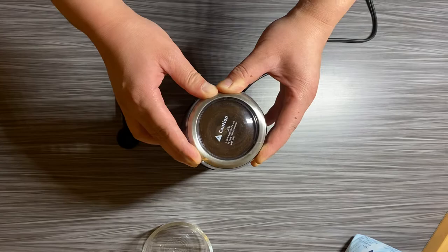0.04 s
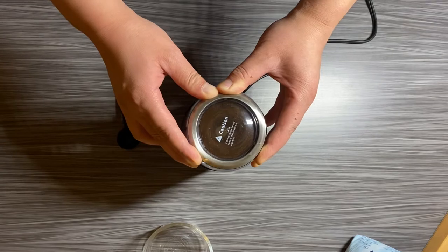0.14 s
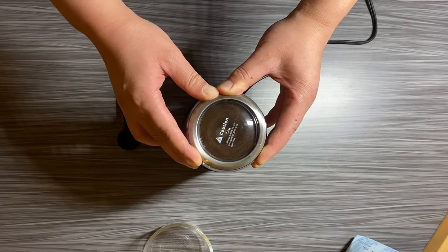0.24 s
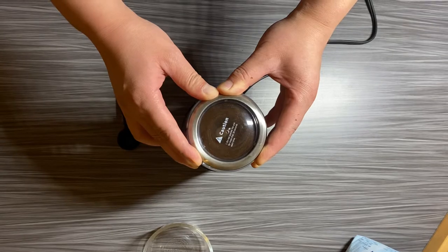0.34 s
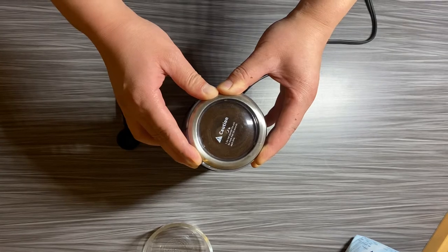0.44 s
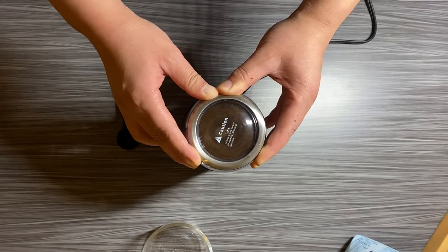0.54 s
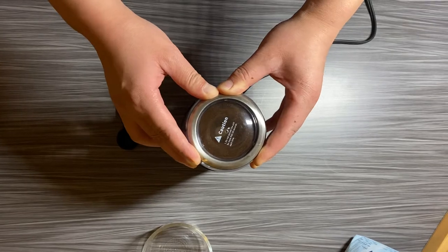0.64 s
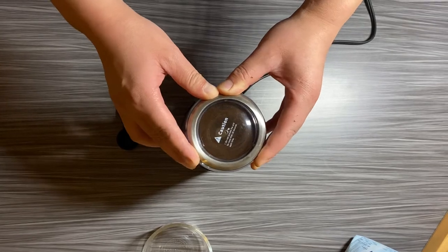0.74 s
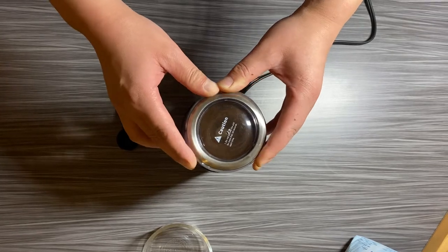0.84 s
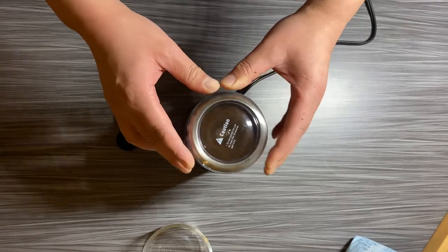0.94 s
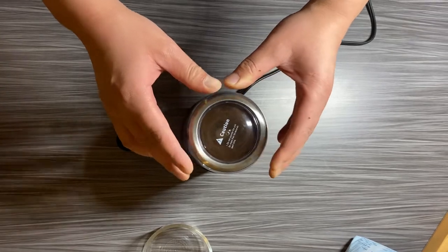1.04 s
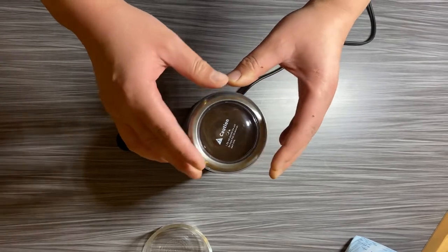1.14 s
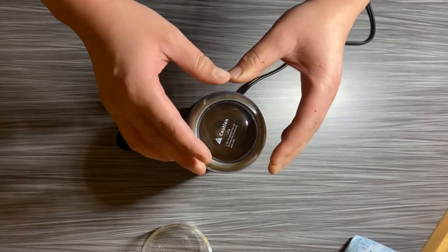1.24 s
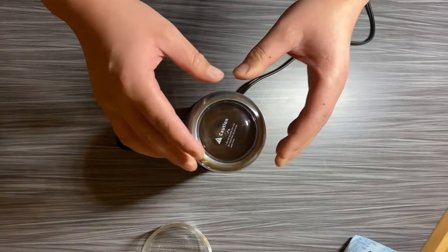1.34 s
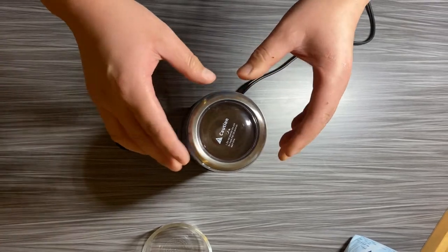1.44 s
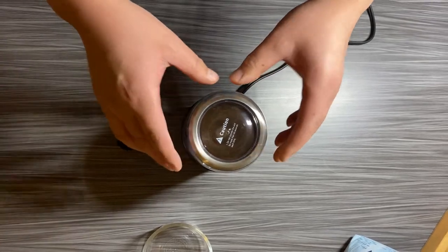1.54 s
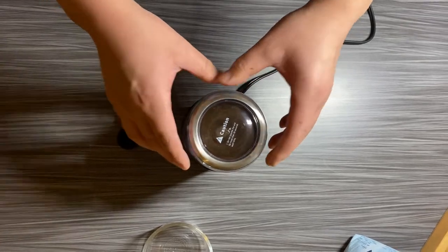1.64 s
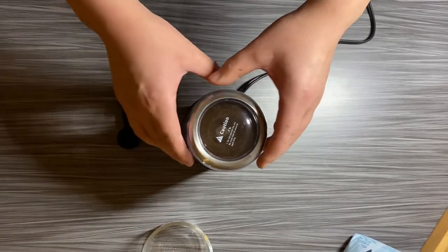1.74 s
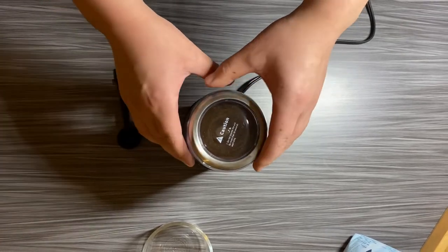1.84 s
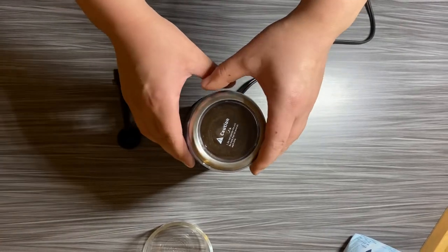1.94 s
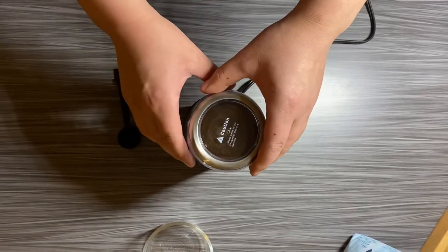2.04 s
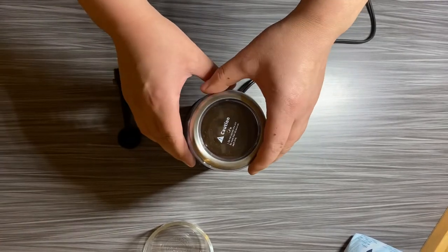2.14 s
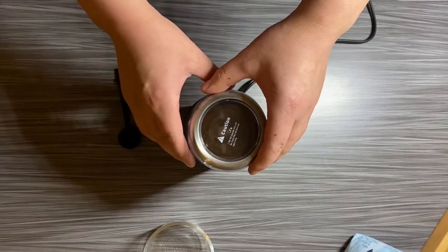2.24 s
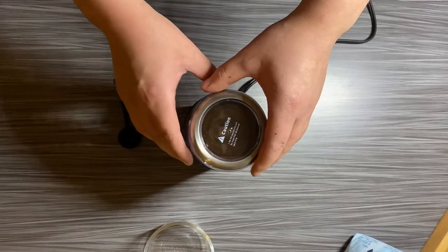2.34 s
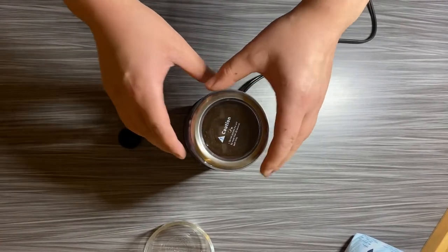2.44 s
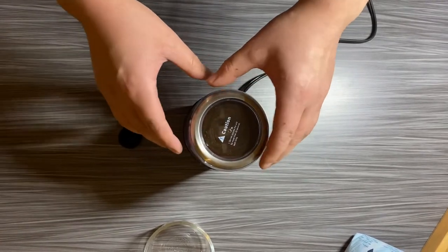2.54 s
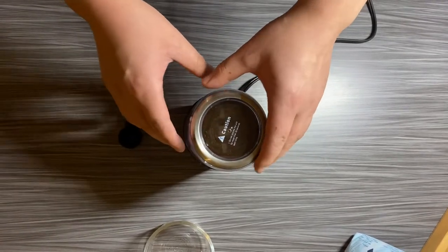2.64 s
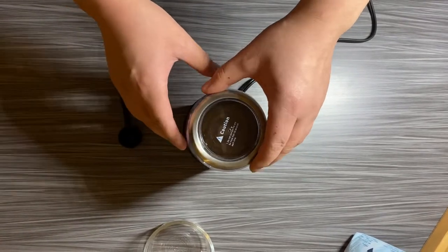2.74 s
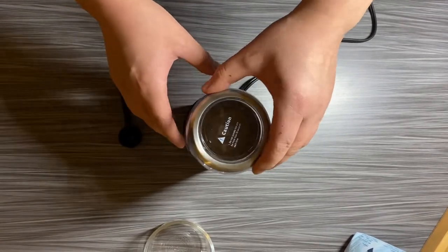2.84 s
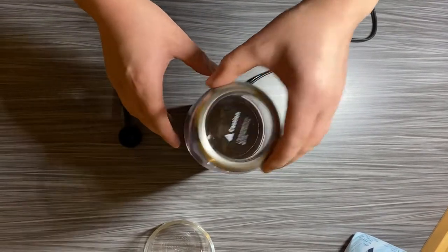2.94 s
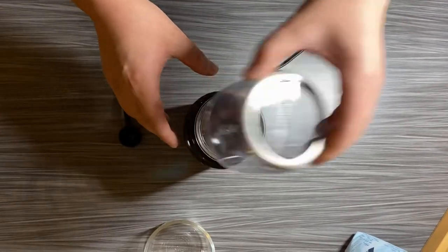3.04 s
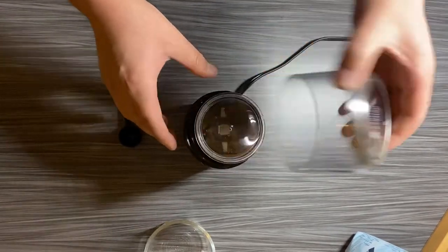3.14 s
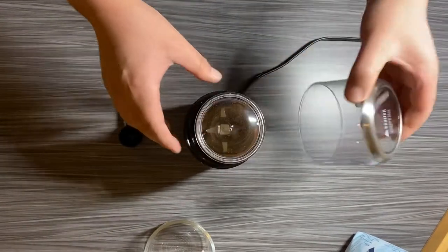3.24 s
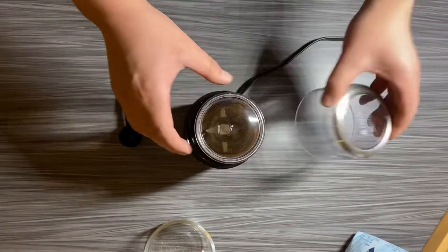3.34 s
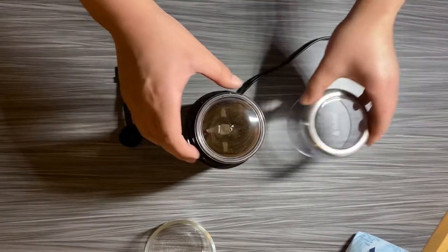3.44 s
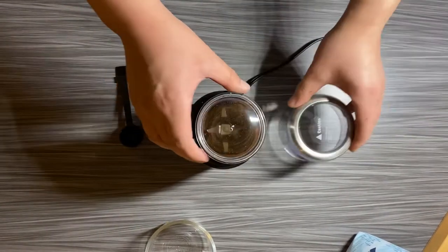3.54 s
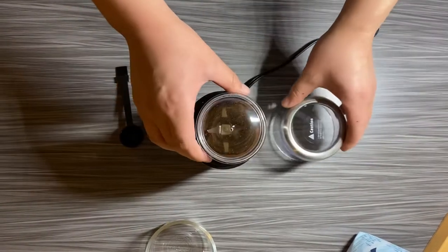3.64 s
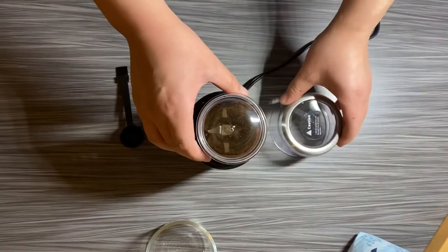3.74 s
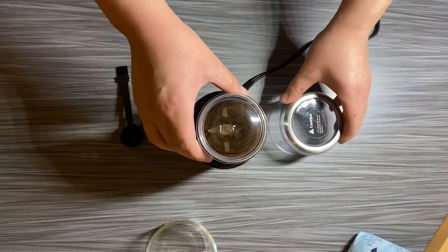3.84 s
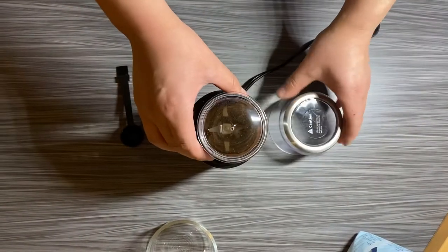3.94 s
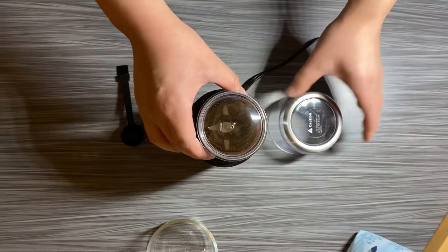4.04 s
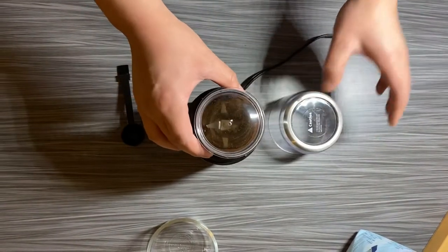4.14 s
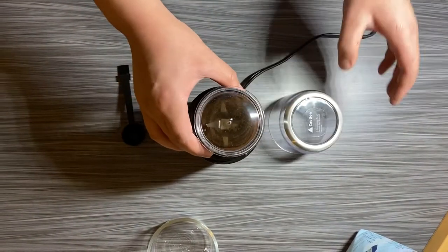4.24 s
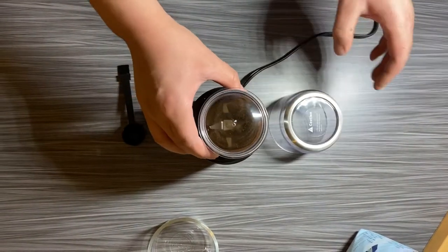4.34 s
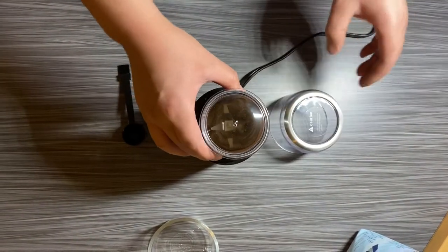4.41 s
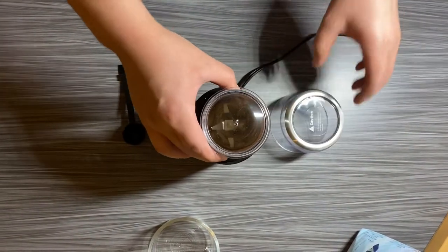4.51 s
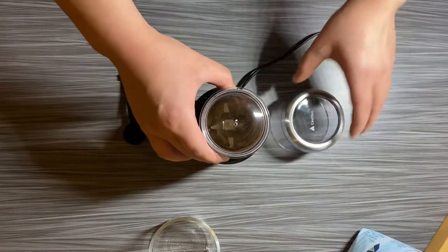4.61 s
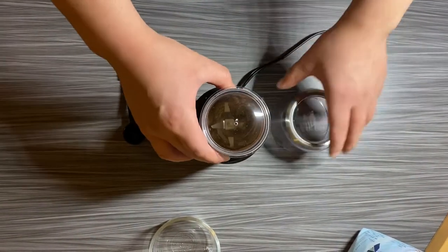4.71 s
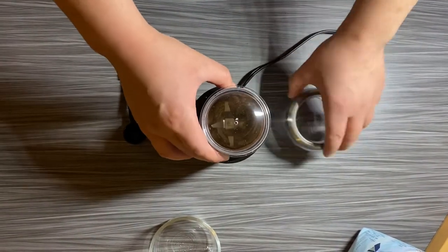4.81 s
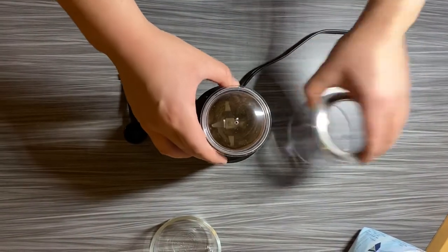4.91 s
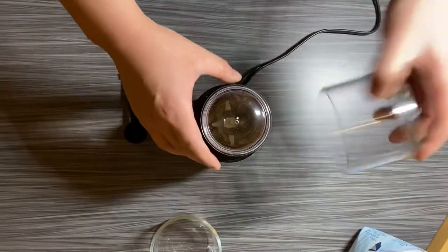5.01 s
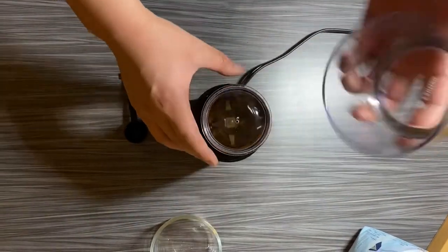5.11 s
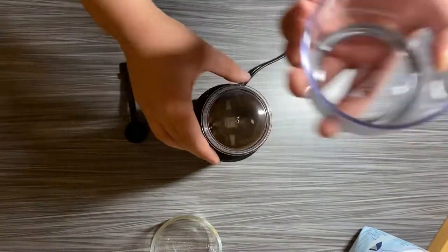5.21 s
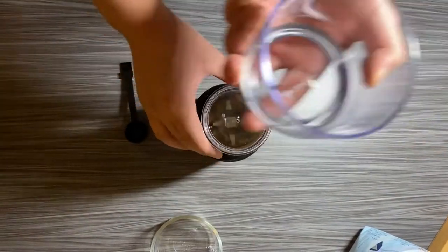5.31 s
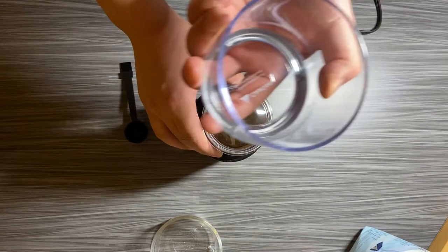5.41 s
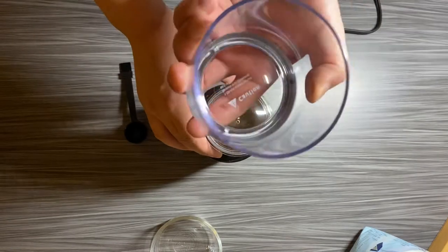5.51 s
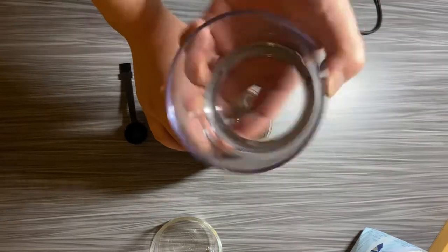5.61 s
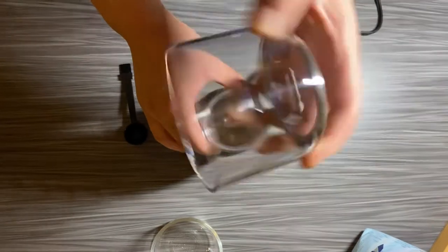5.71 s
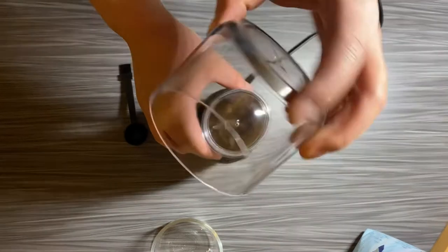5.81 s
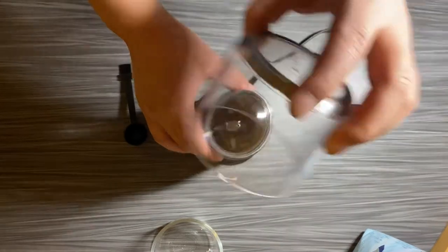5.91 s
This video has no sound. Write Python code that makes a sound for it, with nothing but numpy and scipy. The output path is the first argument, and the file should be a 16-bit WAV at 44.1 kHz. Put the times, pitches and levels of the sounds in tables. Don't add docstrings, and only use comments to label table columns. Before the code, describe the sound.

Handheld grinder buzzes at full speed, coasts down in a falling whine with rattling crumbs, then quiet lid clicks and one loud table knock.

```python
import sys
import numpy as np
from scipy import signal
from scipy.fft import rfft, irfft, next_fast_len
from scipy.io import wavfile

SR = 44100
rng = np.random.default_rng(int(sys.argv[2]) if len(sys.argv) > 2 else 0)


def voltage_ratio(decibels):
    exponent = np.asarray(decibels, float) / 20
    return 10 ** exponent


def transcribe(signal):
    frames = np.atleast_2d(signal).T
    limited = np.clip(frames, -1, 1)
    pcm = np.round(limited * 32767).astype(np.int16)
    wavfile.write(sys.argv[1], SR, pcm)


N = 263277
T = np.arange(N) / SR
FULL_HZ = 422
COAST_S = 0.695


def evened(x):
    return x / np.sqrt(np.mean(x ** 2) + 1e-20)


def peaked(x, db):
    return voltage_ratio(db) * x / abs(x).max()


def add(mix, s, sound):
    part = mix[round(s * SR):][:len(sound)]
    part += sound[:len(part)]


def bump(s, length):
    return np.exp(-.5 * ((T - s) / max(length, .005)) ** 2)


def step(s, rise):
    return .5 + .5 * np.tanh((T - s) / max(rise, .002))


def read(points, hz):
    f, value = np.transpose(points)
    return np.interp(np.log(hz + 1), np.log(f + 1), value)


def curve(rows, axis=1, fade=.03):
    rows = np.array(rows)
    outside = np.maximum(rows[0, 0] - T, 0) + np.maximum(T - rows[-1, 0], 0)
    return voltage_ratio(np.interp(T, rows[:, 0], rows[:, axis]) - 20 * outside / fade)


def colour(x, gain):
    size = next_fast_len(N)
    return irfft(rfft(x, size) * gain(np.fft.rfftfreq(size, 1 / SR)), size)[..., :N]


def above(x, order, hz):
    return signal.sosfilt(signal.butter(order, hz, "high", fs=SR, output="sos"), x)


def ringing(x, resonances):
    def response(f):
        total = 0
        for k, (hz, width, db) in enumerate(resonances):
            detuning = (f * f - hz * hz) / (np.maximum(f, 1) * width)
            total = total + (-1) ** k * voltage_ratio(db) / (1 + 1j * detuning)
        return total
    return colour(x, response)


def wander(hz):
    return evened(colour(rng.standard_normal(N), lambda f: np.exp(-(f / hz) ** 2)))


def speed():
    ease_s, sag_hz_per_s2 = 0.4, 80
    drag_s, friction_hz = 1.72, 300
    powered = FULL_HZ - sag_hz_per_s2 * (np.clip(T, ease_s, COAST_S) - ease_s) ** 2
    decay = np.exp(-np.maximum(T - COAST_S, 0) / drag_s)
    return np.maximum((powered + friction_hz) * decay - friction_hz, 1)


def turns():
    return np.cumsum(speed()) / SR


def order_db(order):
    # powered level in dB, coasting level at full speed in dB,
    # time in seconds when the drive leaves it.
    order_levels = [(-27, -44, .66), (-42, -50, .625), (-33, -54, .615), (-37, -54, .75), (-36.5, -54, .62)]
    # frequency in Hz, width in Hz, lift in dB.
    swept = [(295.4, 44, 17.5), (352, 22, 9.5), (520, 25, 16), (700, 28, 4.5), (1040, 51, 7),
             (1640, 60, 10)]
    # time in seconds, length in seconds, change in dB.
    grip = [
        (.56, .05, -2.5),
        (.585, .045, 18),
        (.51, .04, -11),
        (.705, .025, 8),
        (.57, .04, -3),
    ]
    powered_db, coast_db, off_s = order_levels[order - 1]
    s, length, change_db = grip[order - 1]
    shaft = speed()
    lift_db = sum(db / (1 + ((order * shaft - hz) / width) ** 2) for hz, width, db in swept)
    unbalance_db = 29.5 * np.log10(shaft / FULL_HZ)
    coasting = coast_db + lift_db + unbalance_db - 400 * np.maximum(T - 1.3, 0)
    off = step(off_s, .01)
    return (1 - off) * (powered_db + change_db * bump(s, length)) + off * coasting


def rotor():
    # order, level in dB.
    high_orders = [(7, -55), (9, -64.5), (10, -56.5), (11, -60.5)]
    angle = 2 * np.pi * turns()
    flutter_db = .4 + 4 * step(COAST_S, 0.017)
    low = 0
    for k in range(1, 6):
        level = voltage_ratio(order_db(k) + flutter_db * wander(15))
        low = low + level * np.sin(k * angle + 0.044 * wander(25))
    high = 0
    for k, db in high_orders:
        high = high + voltage_ratio(db + 0.72 * wander(20)) * np.sin(k * angle + 0.35 * wander(36))
    high_db, high_off_s, fall_db_per_s = 9.5, 0.5, 157
    high_gain = voltage_ratio(high_db - fall_db_per_s * np.maximum(T - high_off_s, 0))
    return np.sqrt(2) * (low + high * high_gain)


def motor():
    # frequency in Hz, width in Hz, level in dB.
    held = [(130, 16, -7.5), (250, 72, -18.5), (356, 32, 0.5), (570, 4, -7.5), (600, 13, -5),
            (1040, 80, -4.5), (1152, 17, -10.5), (1319, 90, -13), (1443, 29, 1.5), (1560, 74, -15),
            (1808, 630, -22.5), (2410, 250, -20.5), (2707, 44, -12), (3370, 17, -28.5)]
    mains_angle = 2 * np.pi * 120 * T
    pulse = 1 + 0.21 * np.cos(mains_angle)
    shake = evened(ringing(rng.standard_normal(N) * pulse * voltage_ratio(2.2 * wander(82)), held))
    hum = voltage_ratio(-16 + 3.0 * wander(8)) * np.sin(mains_angle)
    drive_db, off_s, fall_db_per_s = -24.5, .52, 295.5
    return voltage_ratio(drive_db - fall_db_per_s * np.maximum(T - off_s, 0)) * (shake + hum)


def grounds():
    # time in seconds, level in dB.
    grind = [(0, -38.5), (.55, -38.5), (.68, -38), (.8, -38.5), (.86, -37.5), (1.02, -40), (1.11, -45),
             (1.42, -46), (1.57, -50.5), (1.83, -59.5), (1.88, -67), (2.05, -77.5), (2.12, -102)]
    # frequency in Hz, width in Hz, level in dB.
    base_modes = [(124, 21, -19), (300, 74, 0.5), (367, 93, -2), (496, 140, -9), (674, 50, -4),
                  (708, 72, -7.5)]
    cup_modes = [(1010, 200, -15.5), (1375, 34, -1), (1689, 80, 4.5), (1733, 21, -8.5), (2010, 89, -4.5),
                 (2300, 900, -12), (2623, 38, -1.5)]
    lid_ring = [(3030, 110, 0), (3115, 90, 0)]
    # frequency in Hz, density in dB per Hz.
    swirl_spectrum = [(400, -17.5), (700, -7.5), (1400, -4.5), (2300, -5.5), (4000, -1.5), (6000, -2.5),
                      (7400, -5.5), (8070, 4), (8600, -9), (11000, -1), (13500, -5), (16000, -6)]
    # time in seconds, length in seconds, lift in dB.
    hops = [
        (0.663, 0.06, 7),
        (0.906, 0.021, 5),
        (1.3, 0.09, 2),
        (1.464, 0.02, 6.5),
        (1.6, 0.12, 3.5),
        (1.869, 0.046, 4.5),
    ]
    dust_hz = 9000
    sweep = 1 + 0.22 * np.cos(2 * np.pi * turns())
    gusts = voltage_ratio(1.4 * wander(37))
    sizes = voltage_ratio(3.7 * np.minimum(rng.exponential(1, (3, N)), 5))
    crumbs = rng.standard_normal((3, N)) * sizes * sweep * gusts
    stir_db = 20 * np.log10(curve(grind) + 1e-12) + 38
    free = step(0.58, 0.075)

    def law(held_db, free_db, slope):
        return voltage_ratio(held_db + (free_db - held_db) * free + slope * stir_db)

    cup = law(-40, -33.5, 1) * evened(ringing(crumbs[0], cup_modes))
    hopping = voltage_ratio(sum(db * bump(s, length) for s, length, db in hops))
    base = law(-49.5, -35, .7) * hopping * evened(ringing(crumbs[1], base_modes))
    lid = law(-51.5, -37.5, 0.94) * evened(ringing(crumbs[1], lid_ring))
    coarse = colour(crumbs[2], lambda f: voltage_ratio(read(swirl_spectrum, f)) * (f < dust_hz))
    fine = colour(crumbs[2], lambda f: voltage_ratio(read(swirl_spectrum, f)) * (f >= dust_hz))
    swirl = law(-32.5, -31.5, 1.1) * evened(coarse)
    dust = law(-37.5, -34.5, 1.2) * evened(fine)
    return cup + lid + base + swirl + dust


def room_tone():
    # frequency in Hz, density in dB per Hz.
    quiet = [(20, -26), (40, -16.5), (100, -4.5), (160, -18), (250, -21.5), (480, -31.5), (700, -34.5),
             (2200, -44), (5400, -48), (9000, -52.5), (12600, -51.5), (16000, -55)]
    # time in seconds, length in seconds, level in dB.
    swells = [
        (0.728, .07, -44.5),
        (0.926, .1, -52.5),
        (1.3, 0.9, -61.5),
        (2.41, 0.23, -64),
        (3.326, 0.092, -61),
        (3.882, .12, -61),
        (4.621, .05, -60),
        (4.8, 0.041, -62),
        (5.299, 0.058, -60.5),
        (5.52, .08, -67.5),
    ]
    hiss_db, rumble_db = -68, -69
    hiss = voltage_ratio(hiss_db) * evened(colour(rng.standard_normal((2, N)), lambda f: voltage_ratio(read(quiet, f))))
    lumpy = rng.standard_normal(N) * voltage_ratio(2.1 * wander(12))
    low = ringing(lumpy, [(54, 19, -0.5), (121.0, 13, 5.5), (195.0, 83, -9.5)])
    low = colour(low, lambda f: 1 / (1 + (f / 330) ** 2))
    at_ports = np.array([[.9, .12], [.9, -0.43]]) @ hiss
    swell = sum(voltage_ratio(db) * bump(s, length) for s, length, db in swells)
    return at_ports + (voltage_ratio(rumble_db) + swell) * evened(low)


def strike(ms, size=6000):
    t = np.arange(size) / SR * 1000
    grit = rng.standard_normal(size) * np.exp(-t / max(ms, .2)) * np.clip(t / (0.05 * ms), 0, 1)
    push = np.arange(size) == round(.2 * ms * SR / 1000)
    return grit + 0.083 * np.linalg.norm(grit) * push


def modes(table):
    t = np.arange(SR // 4) / SR
    return sum(voltage_ratio(db - 60 * t / t60) * np.sin(2 * np.pi * hz * t) for hz, db, t60 in table)


def blows(rows, table):
    out = np.zeros(N)
    grit = signal.iirpeak(6200, 2.5, fs=SR)
    body = modes(table)
    for s, db, tick_db, ms in rows:
        force = strike(ms)
        tick = above(force, 2, 3500)
        add(out, s, peaked(signal.fftconvolve(force, body), db))
        add(out, s, peaked(0.18 * tick + signal.lfilter(*grit, tick), db + tick_db))
    return out


def settling():
    # time in seconds, peak in dB, tick relative to it in dB, contact in ms.
    settle_hits = [
        (2.039, -60, 2, 3.7),
        (2.119, -67.5, 5, 3.),
        (2.1834, -61.5, 1.5, 3),
        (2.3255, -59.5, -2, 1.83),
    ]
    # frequency in Hz, level in dB, t60 in seconds.
    settle_modes = [(716, -5, 0.0211), (1367, -6.5, 0.067), (1685, -15, 0.031), (2166, -10, 0.015)]
    return above(blows(settle_hits, settle_modes), 4, 115)


def thuds():
    # time in seconds, peak in dB, strongest mode in Hz, its t60 in seconds, contact in ms.
    pushes = [(2.181, -57, 250, 0.12, 9.7), (2.329, -43.5, 300, 0.1, 7.4), (2.654, -44, 300, 0.079, 2.8),
              (2.727, -38, 300, 0.079, 6.3), (3.722, -17.5, 325, 0.079, 9.5),
              (4.367, -50.5, 500, 0.045, 9.7), (4.391, -46, 392, 0.069, 11), (4.492, -55.5, 330, .06, 17.4),
              (4.609, -47, 250, 0.039, 15.4), (4.778, -44, 141.4, 0.19, 3.1),
              (5.354, -54.5, 554, 0.045, 9.4)]
    # frequency in Hz, level in dB, t60 in seconds.
    table_modes = [(125, -14.5, 0.11), (174, -8.5, 0.075), (271, -7.5, 0.05), (300, 6.5, 0.047),
                   (344.8, 1, 0.096), (434, -5.5, 0.065), (500, -9.5, 0.046), (585, -12, 0.04)]
    swell_s = 0.018
    out = np.zeros(N)
    soft = signal.butter(3, 700, fs=SR, output="sos")
    for s, db, hz, t60, ms in pushes:
        body = modes(table_modes + [(hz, 6.0, t60)])
        sound = signal.fftconvolve(signal.sosfilt(soft, strike(ms)), body)
        rise = np.clip(np.arange(len(sound)) / SR / swell_s, 0, 1)
        add(out, s, peaked(sound * np.sin(np.pi / 2 * rise) ** 2, db))
    return above(out, 4, 115)


def rustles():
    # time in seconds, length in seconds, level in dB, lowest frequency in Hz.
    slides = [
        (2.33, 0.13, -95, 1816),
        (3.63, .04, -83.5, 9500),
        (3.789, .04, -72, 9400),
        (3.92, .015, -65.5, 5500),
        (4.76, 0.0145, -62, 5500),
        (4.818, 0.011, -73.5, 5560),
        (4.96, 0.022, -81.5, 5000),
        (5.037, 0.019, -87, 9500),
        (5.299, .04, -87, 9500),
    ]
    span = 2.2
    size = next_fast_len(N)
    grain = rfft(rng.standard_normal(N) * voltage_ratio(2.5 * wander(150)), size)
    f = np.fft.rfftfreq(size, 1 / SR) + 1
    out = np.zeros(N)
    for s, length, db, low_hz in slides:
        u = (f / low_hz) ** 6
        band = irfft(grain / (1 + 1 / u) / (1 + u / span ** 6), size)[:N]
        out += voltage_ratio(db) * bump(s, length) * evened(band)
    return out


def rim_clicks():
    # time in seconds, peak in dB, tick above 3 kHz relative to it in dB, contact in ms.
    rim_hits = [
        (2.650, -58.5, -3.5, 15),
        (2.676, -49, -3, 2.3),
        (2.7164, -44, 8, 8.5),
        (2.728, -44, -4.5, 20),
        (4.49, -76, -6.5, 6.),
        (4.61, -69, 6, 4.2),
    ]
    # frequency in Hz, level in dB, t60 in seconds.
    rim_modes = [(605, 8, 0.032), (1057, 0.5, 0.055), (1210, -14, 0.037), (1780, 4, 0.067),
                 (2720, -7, 0.054), (3330, -3.5, 0.021), (4400, -24.5, 0.034), (1360, 10, 0.0025),
                 (3630, -18, 0.0049)]
    return above(blows(rim_hits, rim_modes), 4, 115)


def lid_knocks():
    # time in seconds, peak in dB, tick above 3 kHz relative to it in dB, contact in ms.
    lid_hits = [
        (3.7205, -4.5, -15.5, 1.8),
        (3.727, -9.5, -17.5, 4.5),
        (3.737, -9, -26, 3.),
        (3.752, -17.5, -22.5, 5.5),
        (3.7995, -20.5, -19, 2.2),
        (3.86, -37, -28, 16),
        (3.9, -36.5, -20.5, 39),
        (4.368, -61.5, -7, 4.),
        (4.405, -66.5, -5.5, 6.),
    ]
    # frequency in Hz, level in dB, t60 in seconds.
    lid_modes = [(534.2, 8.5, 0.0366), (611, 10.5, 0.04), (638, 2.5, 0.064), (827, 0, 0.037),
                 (1068, 0.5, 0.03), (1300, 1, 0.055), (1380, 3, 0.026), (1440, -1, 0.045), (2020, -2, .03),
                 (2300, -21.5, .025), (4570, -25, .015), (830, 14, 0.01), (1373, 11, 0.012),
                 (2310, -15.5, 0.0055)]
    return above(blows(lid_hits, lid_modes), 2, 380)


def lid_lift():
    # time in seconds, peak in dB, tick relative to it in dB, contact in ms.
    lift_hits = [
        (4.742, -55, 2.5, 40),
        (4.774, -38, -16.5, 14.),
        (4.795, -40, -20.5, 15),
        (4.84, -60, -20, 21),
    ]
    # frequency in Hz, level in dB, t60 in seconds.
    lift_modes = [(640, -2.5, 0.061), (814, 16, 0.033), (1350, 18, 0.036), (1905, -10.5, 0.012),
                  (2610, -31, .02), (950, 24, 0.0092), (1880, -30, 0.0042)]
    return above(blows(lift_hits, lift_modes), 4, 115)


def tail(size):
    # frequency in Hz, t60 in seconds.
    room_decay = [(120, 0.42), (330, 0.25), (870, 0.44), (2300, 0.35), (6000, 0.29), (12000, 0.06)]
    hz, t, z = signal.stft(rng.standard_normal((2, size)), SR, nperseg=256)
    t60 = np.maximum(read(room_decay, hz), .05)[:, None]
    out = signal.istft(z * voltage_ratio(-60 * t / t60), SR, nperseg=256)[1]
    out *= np.clip(np.arange(out.shape[1]) / SR / 0.0013, 0, 1)
    return out / np.linalg.norm(out[0])


def ports(x):
    # frequency in Hz, lead of the left in radians.
    port_phase = [(0, 0), (520, -.1), (860, -.9), (1290, .5), (3010, -.8), (3960, -.2), (5000, -1.5),
                  (5700, -.5), (6600, 0), (7400, 2.0), (9000, 3.14), (10500, 4.6), (11500, 6.1),
                  (13000, 6.4), (14500, 8.6)]
    # frequency in Hz, left minus right in dB.
    port_balance = [(60, 0), (150, .8), (350, 1.4), (650, -2.9), (1400, -1), (2800, 0), (5600, -1),
                    (9000, 0)]
    # frequency in Hz, likeness of the ports (1 is identical).
    port_same = [(60, 0.88), (250, 1), (600, 0.5), (1300, 0.66), (3000, 0.87), (5000, 0.13), (7000, 0.49),
                 (14000, 0.99)]
    reflections = rng.standard_normal(700) * np.exp(-np.arange(700) / 45.0)
    scramble = 1j * evened(rfft(reflections, next_fast_len(N)).imag)
    side = np.array([[.5], [-.5]])

    def gain(f):
        same = np.clip(read(port_same, f), -1, 1)
        pair = np.exp(1j * side * read(port_phase, f)) * voltage_ratio(side * read(port_balance, f))
        return pair * (np.sqrt((1 + same) / 2) + 2 * side * scramble * np.sqrt((1 - same) / 2))
    return colour(x, gain)


def emptied(x, gaps):
    hz, t, z = signal.stft(x, SR, nperseg=1024)
    hz = hz[:, None]
    for low, high, jitter in gaps:
        jumps = np.round(rng.standard_normal((len(t) // 3 + 1, 2)) * .7)
        edge = jitter * jumps.repeat(3, 0)[:len(t)].T
        z = z * ((hz < low + edge[0]) | (hz > high + edge[1]))
    return signal.istft(z, SR, nperseg=1024)[1][:N]


def scene():
    machine = rotor() + motor() + grounds()
    table = thuds()
    handled = settling() + rim_clicks() + lid_lift()
    knocks = lid_knocks()
    send = voltage_ratio(-11.5) * machine + voltage_ratio(-9.5) * knocks + voltage_ratio(-13.5) * (table + handled)
    wet = signal.fftconvolve(send[None], tail(SR), axes=1)[:, :N]
    spread = colour(wet[1], lambda f: .8 / (1 + (400 / np.maximum(f, 1)) ** 2))
    heard = ports(machine + knocks + table + handled + wet[0])
    return heard + np.array([spread, -spread]) + room_tone() + ports(rustles())


def top_cut(x):
    return signal.sosfilt(signal.butter(12, 14590, fs=SR, output="sos"), x)


def record(dry):
    # lower edge in Hz, upper edge in Hz, edge jitter in Hz.
    mid_gaps = [(8300, 9550, 250), (13900, 16500, 150)]
    side_gaps = [(6350, 6800, 200), (11100, 13200, 250)]
    left, right = above(dry, 2, 40)
    mid = emptied((left + right) / 2, mid_gaps)
    side = emptied((left - right) / 2, side_gaps)
    return top_cut(np.array([mid + side, mid - side]))


dry = scene()
out = record(dry)
transcribe(out)
```